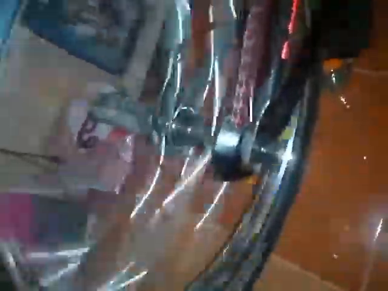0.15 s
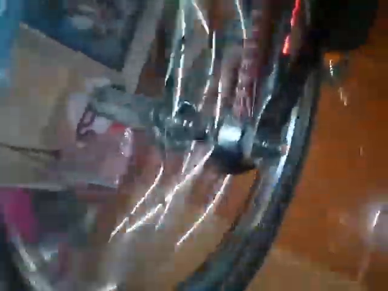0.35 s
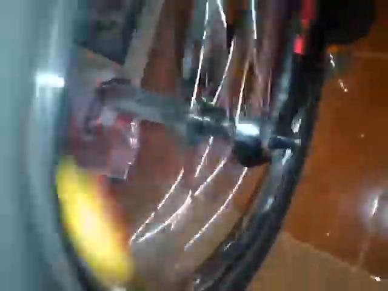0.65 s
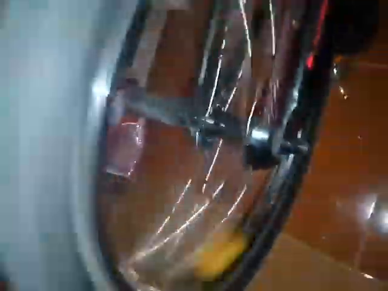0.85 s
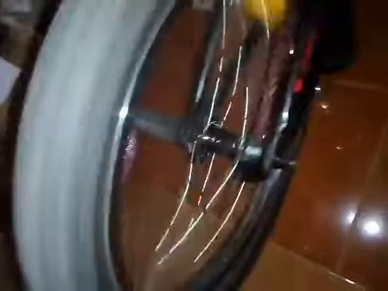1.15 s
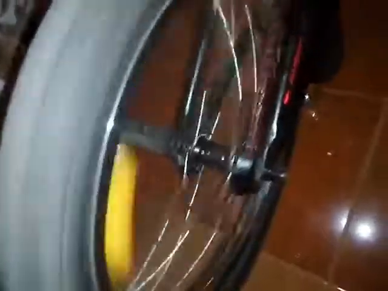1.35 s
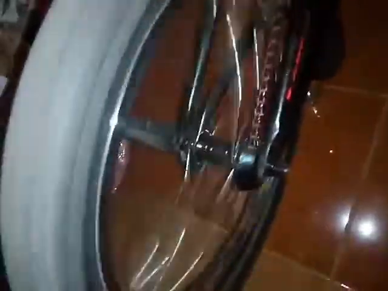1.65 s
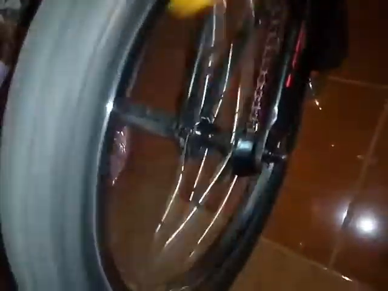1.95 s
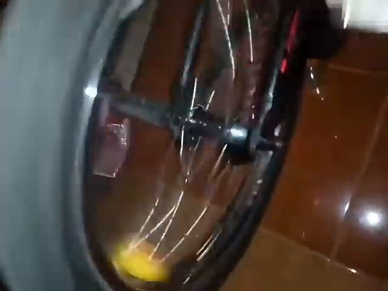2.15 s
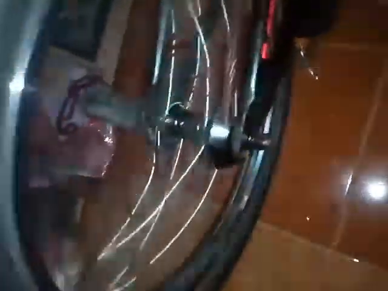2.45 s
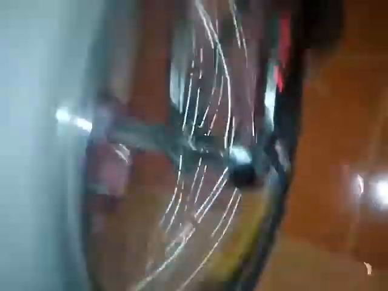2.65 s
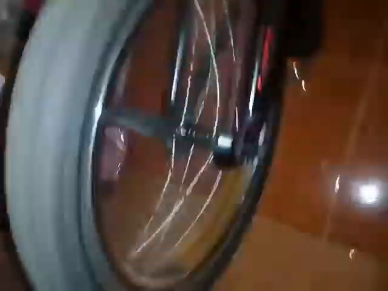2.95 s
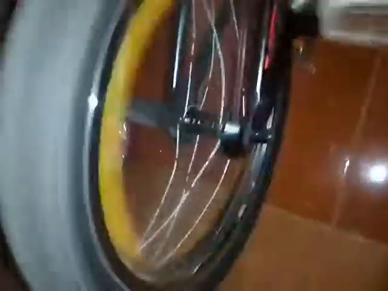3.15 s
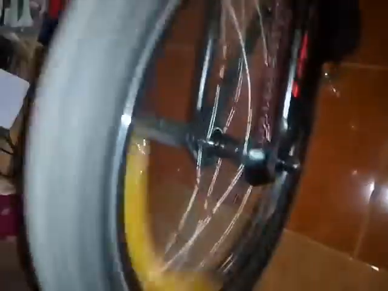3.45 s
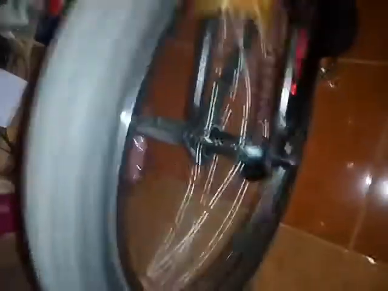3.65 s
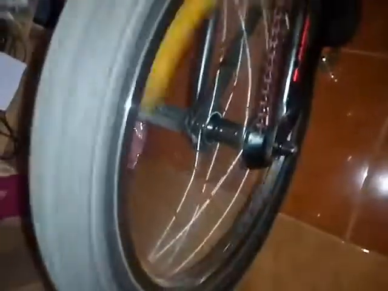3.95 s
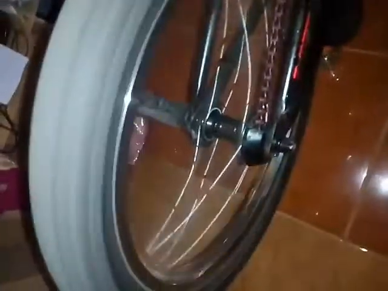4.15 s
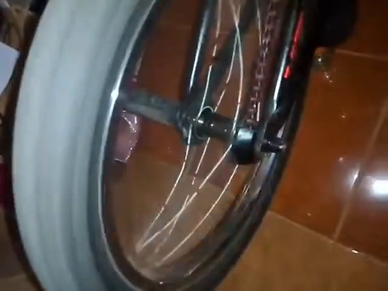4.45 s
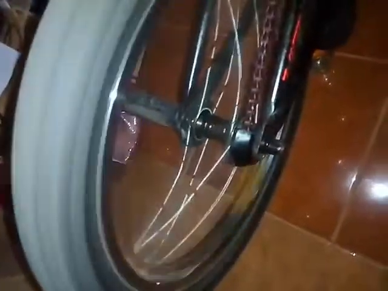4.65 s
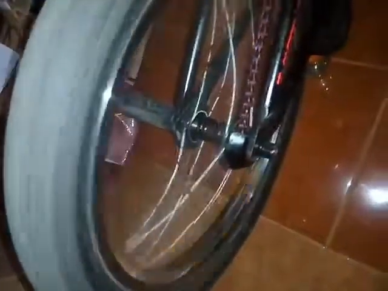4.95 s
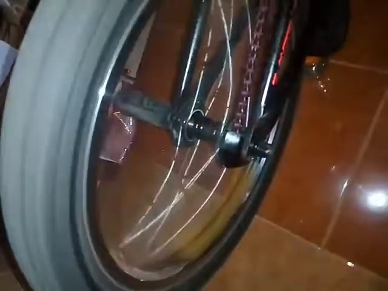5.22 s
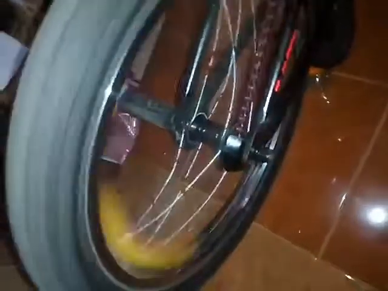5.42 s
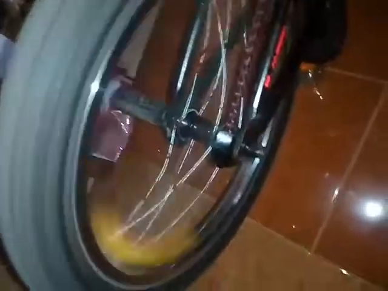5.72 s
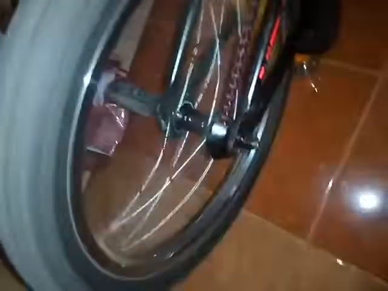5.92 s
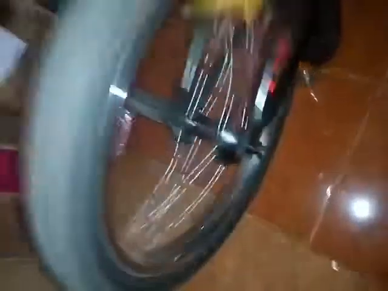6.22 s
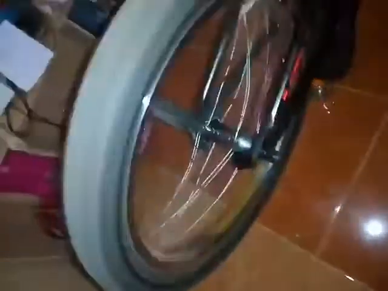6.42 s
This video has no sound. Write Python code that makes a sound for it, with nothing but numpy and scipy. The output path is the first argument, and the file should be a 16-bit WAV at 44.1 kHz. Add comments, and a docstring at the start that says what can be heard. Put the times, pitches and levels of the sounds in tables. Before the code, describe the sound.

Very close to a bicycle's rear hub in a small tiled room. A short run of fast ratchet clicks slows and stops, light chain ticks follow, then a second short burst. Chain rustle and hard metallic clacks come next, then a long, bright, cricket-like buzz that gradually sinks, with a few soft tyre brushes, slowing abruptly into single clicks and a final chain rustle.

```python
"""Rear wheel cranked by hand

A bicycle stands on the tiles of a small room, a phone's microphone close by, and its rear wheel is cranked by hand.
When the cranks rest, two freehub pawls drop over the ratchet teeth as filtered impacts: two short bursts, then a
long buzz that sinks as the wheel coasts. Pushes bring a rustle of tiny chain clicks, with ticks link by link, a
stronger drone of filtered noise from the frame, and knocks; twice the drive catches with a hard clack."""
import sys
import numpy as np
from scipy import signal
from scipy.fft import rfft, irfft, next_fast_len
from scipy.io import wavfile
from scipy.ndimage import uniform_filter1d, map_coordinates

SR = 44100
rng = np.random.default_rng(int(sys.argv[2]) if len(sys.argv) > 2 else 0)


def int16_out(signal):
    """Quantize to a 16-bit WAV file."""
    q = np.round(np.clip(np.atleast_2d(signal).T, -1, 1) * 32767)
    wavfile.write(sys.argv[1], SR, q.astype(np.int16))


N = 290178
RING_SIZE = 16384  # samples in one contact or one filter response

# In every colour, mode and shade table the levels are relative: each filter is scaled to unit energy.

# The two short spins, hub close to the microphone: [t/s, rate/(pawl drops per s)]
FIRST_SPIN = [(0.002, 55.8), (0.15, 54.7), (0.28, 50.8), (0.36, 44.6), (0.42, 35.2)]
SECOND_SPIN = [(1.523, 40.7), (1.58, 46.5), (1.64, 62.5), (1.73, 70.4), (1.96, 62.4), (2.02, 43.5),
               (2.07, 34.2)]
# Single full drops of a pawl while the hub turns slowly: [t/s, approximate peak level/dB]
PAWL_DROPS = [(0.4429, -12.5), (0.4761, -12.5), (0.5192, -13.5), (0.5706, -14), (1.4572, -15),
              (1.4982, -14.5), (2.1231, -16), (3.2957, -17.5), (3.3206, -15.5), (3.3414, -17.5),
              (3.3807, -17.5), (3.399, -13), (3.4221, -15), (6.4367, -21), (6.4582, -20), (6.4838, -17.5)]
# Broad colour of the hub shell: [f/Hz, level/dB]
HUB_COLOUR = [(100, -51), (290, -42.5), (530, -42), (690, -25), (1250, -25), (1600, -15.5), (3000, -9),
              (5000, -14), (5700, -6), (7300, -10.5), (9000, -23.5), (10200, -16.5), (12000, -18),
              (13600, -21.5), (15500, -22.5)]
# Resonances of the hub shell above that colour: [f/Hz, width/Hz, level/dB]
HUB_MODES = [(669, 80, 5.5), (1507, 46, 6), (1956, 204, 5.5), (2248, 215, 10), (2382, 166, 8),
             (3850, 87, 4), (4220, 65, 1.5), (4150, 410, 4.5), (4338, 238, 11), (5960, 110, 2),
             (7070, 87, 7), (11470, 180, 6.5), (12500, 380, 11.5), (12846, 336, 11.5)]
# Change of the hub's colour at low speed: [f/Hz, width/Hz, level/dB]
SLOW_SHADE = [(730, 130, 5), (1580, 260, -2.5), (2870, 110, 1), (4360, 370, -0.5)]


def freehub():
    """Spins and single drops ring one hub shell; the long buzz goes without the low-speed shade."""
    slow = spin(FIRST_SPIN, jitter_s=0.0003, scatter_db=1.5, hold_s=0.0643, room_db=0.1, ease_db=-0.5)
    slow += spin(SECOND_SPIN, jitter_s=0.0003, scatter_db=0.5, hold_s=0.0728, room_db=0.0, ease_db=2)
    slow += hits(PAWL_DROPS, lambda: pawl_drop(room_db=-0.2), crest_db=18.0)
    fast = spin(long_spin(), jitter_s=0.00015, scatter_db=1.69, hold_s=0.2014, room_db=0.1, ease_db=9.5,
                waver=0.003)
    return body(slow, HUB_COLOUR, HUB_MODES + SLOW_SHADE) + body(fast, HUB_COLOUR, HUB_MODES)


COAST_START_S, CRANK_AGAIN_S, COAST_END_S = 3.441, 6.21, 6.42
WHEEL_RATE, FRICTION_PER_S = 181, 8  # wheel's speed at the start (teeth/s) and its loss (teeth/s per s)
CRANK_RATE, CRANK_STOP_S, CRANK_GAIN_PER_S = 115, 0.1, 510  # teeth/s, decay time s, teeth/s per s


def long_spin():
    """(s, pawl drops per s) rows, wheel less cranks: cranks stop, friction slows the wheel, cranks catch up."""
    s = np.linspace(COAST_START_S, COAST_END_S, 300)
    wheel = WHEEL_RATE - FRICTION_PER_S * (s - COAST_START_S)
    stopping = CRANK_RATE * np.exp((COAST_START_S - s) / CRANK_STOP_S)
    cranking_again = CRANK_GAIN_PER_S * np.maximum(s - CRANK_AGAIN_S, 0)
    return np.column_stack([s, wheel - (stopping + cranking_again)])


BUZZ_DB, BUZZ_DB_PER_DOUBLING = -20, 2.5  # level going into the hub at WHEEL_RATE, and its growth with speed
EASE_S = 0.089  # time constant of the change in level toward the end of a spin


def spin(rows, jitter_s, scatter_db, hold_s, room_db, ease_db, waver=0):
    """Two pawls drop in turn, one drop a tooth, louder with speed; each fades to a new ring every hold_s."""
    s, rate = np.transpose(rows)
    t = np.arange(s[0], s[-1] + 0.01, 1 / SR)
    speed = np.interp(t, s, rate) * (1 + waver * wobble(6)[:len(t)])
    teeth = np.cumsum(speed) / SR
    times = np.interp(np.arange(int(teeth[-1]) + 1), teeth, t)
    rates = np.interp(times, s, rate)
    db = BUZZ_DB + BUZZ_DB_PER_DOUBLING * np.log2(rates / WHEEL_RATE)
    db -= ease_db * np.exp((times - s[-1]) / EASE_S)
    sizes = amp(db) * np.sqrt(SR / rates)  # unit-energy drops at this rate then have rms amp(db)
    chance = rng.standard_normal((len(times), 2))
    turn = (times - s[0]) / hold_s
    rings = [(pawl_drop(room_db), pawl_drop(room_db)) for _ in range(int(turn[-1]) + 2)]
    track = np.zeros(N)
    for k, (late, strong) in enumerate(chance):
        old, pawl = int(turn[k]), k % 2
        blend = turn[k] % 1 * np.pi / 2
        ring = np.cos(blend) * rings[old][pawl] + np.sin(blend) * rings[old + 1][pawl]
        add(track, times[k] + jitter_s * late, sizes[k] * amp(scatter_db * strong) * ring)
    return track


def pawl_drop(room_db, bounce_s=0.0016, loss_db=1.35, count=5):
    """A pawl snaps into the next tooth and chatters there for a few milliseconds."""
    gaps = bounce_s * rng.uniform(0.5, 1.5, count - 1)
    delays = np.r_[0, np.cumsum(gaps)]
    levels = -loss_db * np.arange(count) + rng.normal(0, 1.0, count)
    bounces = list(zip(delays, levels))
    return impact(crack_t60=0.0088, rattle_t60=0.027, rattle_db=-7, room_db=room_db, bounces=bounces)


# Low ring of the frame, read at each partial: [f/Hz, relative level/dB]
THROB_COLOUR = [(560, -28), (690, 4), (760, 0), (900, -3.5), (1050, 1), (1300, -8)]
THROB_DB = -55  # rms over the whole scene
THROB_SWELL_DB, THROB_JITTER_S = 5.5, 0.00022  # random spread of each partial's level and of the beat's timing


def throb():
    """At speed one pawl also knocks the frame, every second tooth: wavering partials follow the hub's rate."""
    rate = curve(long_spin())
    beat = rate / 2
    turns = np.cumsum(beat) / SR + THROB_JITTER_S * beat * wobble(31)

    def partial(k):
        level = amp(along(THROB_COLOUR, k * beat) + THROB_SWELL_DB * wobble(9))
        return level * np.sin(2 * np.pi * k * turns)

    partials = sum(partial(k) for k in range(7, 14))
    return amp(THROB_DB) * unit((rate / WHEEL_RATE) ** 2 * partials)


# The drive catches and the chain knocks, close by: [t/s, approximate peak level of the knock/dB]
CLACKS = [(2.256, -34), (2.371, -14), (2.3753, -12), (2.515, -27.5), (2.851, -28), (2.914, -24),
          (3.232, -10), (3.267, -18.5), (6.507, -25.5)]
# Broad colour of the knocked frame: [f/Hz, level/dB]
CLACK_COLOUR = [(100, -49), (260, -10.5), (420, -12), (700, -9.5), (1050, -5.5), (1550, -11), (2000, -4.5),
                (2700, -4.5), (3400, -18), (4500, -12.5), (6400, -17), (7500, -33), (9000, -48),
                (15000, -32)]
# Resonances of the knocked frame: [f/Hz, width/Hz, level/dB]
CLACK_MODES = [(990, 110, 4.8), (1990, 230, 10.9), (2240, 170, 5.7), (2406, 78, 8.2), (2760, 380, 3.4)]
# Partials of the steel sprocket ring: [f/Hz, relative level/dB, t60/s]
STEEL = [(10150, -1, 0.14), (10130, -1, 0.19), (10650, -12, .1), (11170, 3, .18), (11400, -1, .14),
         (11600, 0, .1), (12270, 1, .09)]


def clacks(waver=1.5):
    """The chain snaps taut: the frame knocks, and hard blows also ring the sprocket high above it."""
    knock = lambda: impact(crack_t60=0.0077, rattle_t60=0.082, rattle_db=2, room_db=0.0)
    knocks = hits(CLACKS, knock, crest_db=19.5)
    steel = np.zeros(N)
    t = np.arange(RING_SIZE) / SR
    # random phase drift, waver in radians
    blur = lambda: waver * map_coordinates(rng.standard_normal(80), [t * 160], mode="mirror")
    for s, db in CLACKS:
        ring = np.zeros(RING_SIZE)
        for hz, level, t60 in STEEL:
            decay = amp(level + rng.normal(0, 1.4) - 60 * t / t60)
            ring += decay * np.sin(2 * np.pi * hz * t + blur())
        add(steel, s, amp(2 * db - 16.5) * ring)  # the ring grows with the square of the blow
    return body(knocks, CLACK_COLOUR, CLACK_MODES) + steel


# Pushes on the cranks: [start t/s, length/s, chain rustle level/dB, frame drone level/dB]
PUSHES = [(0.507, 0.85, -55, -71.5), (2.057, 0.21, -47.5, -64), (2.413, 0.079, -42, -67),
          (2.602, 0.55, -42.5, -54), (3.268, 0.31, -43, -57), (6.32, 0.29, -38.5, -53)]
PUSH_ATTACK_S, PUSH_RELEASE_S = 0.015, 0.1
# Broad colour of the chain: [f/Hz, level/dB]
CHAIN_COLOUR = [(200, -32.5), (380, -34), (550, -7.5), (1000, -6), (1450, -1), (2050, 6.5), (3300, -7.5),
                (4250, -1.5), (4900, -7.5), (6200, -1.5), (7700, -13.5), (9300, -24), (12800, -13.5),
                (14000, -44)]


def chain(links_per_s=200, spread_db=3):
    """During each push the rollers seat on the teeth in a rustle of tiny clicks."""
    seats = (rng.random(N) < links_per_s / SR) * amp(spread_db * rng.standard_normal(N))
    click = impact(crack_t60=0.023, rattle_t60=0.03, rattle_db=4.5, room_db=10.0)
    rustle = signal.fftconvolve(seats, click)[:N]
    level = sum(amp(db) * swell(s, length, PUSH_ATTACK_S, PUSH_RELEASE_S) for s, length, db, _ in PUSHES)
    return level * unit(body(rustle, CHAIN_COLOUR))


# Stray light ticks of the drive: [t/s, approximate peak level/dB]
TICKS = [(0.716, -28.5), (0.7731, -31.5), (0.8028, -28.5), (2.9911, -25), (3.0087, -19.5), (3.0784, -21),
         (3.2051, -18.5), (3.2592, -17.5), (6.5525, -22)]
# Links ticking evenly onto the sprocket: [first t/s, last t/s, links, first level/dB, last level/dB]
# (peak levels before the mid-push swell)
TICK_RUNS = [(0.9707, 1.4005, 7, -32, -35), (2.5345, 2.7625, 7, -30, -22.5), (2.5990, 2.7155, 4, -21, -38)]
# Broad colour of a tick: [f/Hz, level/dB]
TICK_COLOUR = [(200, -13), (1000, -17), (2000, 2), (3400, -2), (4300, 5), (6400, 3), (7800, -5),
               (8200, -14.5), (11500, -16.5), (13000, -9.5), (13700, -30), (15500, -28)]
# Resonances of a tick: [f/Hz, width/Hz, level/dB]
TICK_MODES = [(2160, 520, 5.1), (7640, 87, 4), (8700, 160, 13), (13000, 500, 3.5)]


def ticks():
    """Light contacts of the drive, stray or link by link, ring with a colour of their own."""
    tick = lambda: impact(crack_t60=0.039, rattle_t60=0.081, rattle_db=-6, room_db=-1.5)
    rows = TICKS + link_by_link(TICK_RUNS, swell_db=4)
    return body(hits(rows, tick, crest_db=16.5), TICK_COLOUR, TICK_MODES)


# Links knocking evenly onto the chainring: [first t/s, last t/s, links, first level/dB, last level/dB]
# (peak levels before the mid-push swell)
CHAINRING_RUNS = [(0.9335, 1.1615, 4, -35.5, -38)]
# One link is too light to shake the frame: [f/Hz, width/Hz, level/dB]
LINK_SHADE = [(600, 940, -16)]


def chainring():
    """Single links knock onto the chainring, like small, thin clacks."""
    knock = lambda: impact(crack_t60=0.034, rattle_t60=0.07, rattle_db=-4, room_db=-4.5)
    knocks = hits(link_by_link(CHAINRING_RUNS, swell_db=0.8), knock, crest_db=20.5)
    return body(knocks, CLACK_COLOUR, CLACK_MODES + LINK_SHADE)


def link_by_link(runs, swell_db):
    """One (s, peak dB) row for each evenly spaced link, with a swell that peaks in mid-push."""
    rows = []
    for first, last, links, first_db, last_db in runs:
        for u in np.linspace(0, 1, round(links)):
            db = first_db + u * (last_db - first_db) + swell_db * np.sin(np.pi * u)
            rows.append((first + u * (last - first), db))
    return rows


# Dull bumps of the frame: [t/s, approximate peak level/dB]
BUMPS = [(2.604, -24.5), (2.965, -31), (3.072, -33)]
# Broad colour of the bumped frame: [f/Hz, level/dB]
BUMP_COLOUR = [(80, -32), (190, -14.5), (290, 0), (450, 0.5), (780, 4.5), (1000, -5.5), (2500, -10),
               (6000, -56)]


def bumps():
    """Soft blows on the frame, with little treble."""
    bump = lambda: impact(crack_t60=0.056, rattle_t60=0.09, rattle_db=-9.0, room_db=-4.5)
    return body(hits(BUMPS, bump, crest_db=22.0), BUMP_COLOUR)


# The wheel brushes against something: [start t/s, length/s, level/dB]
BRUSHES = [(0.835, 0.021, -48.5), (1.695, 0.59, -51), (2.93, 0.084, -43), (5.18, 0.12, -43),
           (5.509, 0.12, -32.5), (5.852, 0.084, -41.5)]
BRUSH_RELEASE_S = 0.065
# Broad colour of the brushing tyre: [f/Hz, level/dB]
TYRE_COLOUR = [(300, -35.5), (580, -15.5), (750, -6.5), (1100, -0.5), (1550, -3), (2500, -6.5), (6000, -85)]


def tyre(attack_share=0.25):
    """Each brush of the wheel is coloured noise that swells and dies away."""
    level = sum(amp(db) * swell(s, length, attack_share * length, BRUSH_RELEASE_S) for s, length, db in BRUSHES)
    return level * rush(TYRE_COLOUR)


# Brief swells of the frame's drone: [start t/s, length/s, level before the waver/dB]
HUMS = [(0.844, 0.033, -56.5), (1.384, 0.092, -60)]
# Broad colour of the droning frame: [f/Hz, level/dB]
FRAME_COLOUR = [(100, -39), (200, -12.5), (290, 5), (340, -5), (390, -4.5), (480, -15), (800, -6),
                (2000, -37.5)]
DRONE_DB = -62  # level at WHEEL_RATE, before the waver


def drone(waver_db=1.0):
    """The frame drones unevenly, in step with the hub's speed and more strongly under each push."""
    speed = (curve(FIRST_SPIN) + curve(SECOND_SPIN) + curve(long_spin())) / WHEEL_RATE
    pushed = sum(amp(db) * swell(s, length, PUSH_ATTACK_S, PUSH_RELEASE_S) for s, length, _, db in PUSHES)
    hums = sum(amp(db) * swell(s, length, attack_s=0.03, release_s=0.024) for s, length, db in HUMS)
    level = amp(DRONE_DB) * speed + pushed + hums
    return level * amp(waver_db * wobble(12)) * rush(FRAME_COLOUR)


# Broad colour of the low rumble: [f/Hz, level/dB]
RUMBLE_COLOUR = [(20, -18), (38, -4), (52, 8.5), (65, -8), (80, -1.5), (105, -4), (140, -8.5), (400, -15),
                 (3000, -37)]
RUMBLE_DB, RUMBLE_GROWS = -70, 0.48  # rms level; dB of rumble per dB of the bicycle's noise


def rumble(bicycle, smooth_s=0.13):
    """A faint low rumble rises and falls with the bicycle's noise."""
    power = uniform_filter1d(bicycle ** 2, int(smooth_s * SR))
    loudness = np.sqrt(np.abs(power))
    return amp(RUMBLE_DB) * unit(loudness ** RUMBLE_GROWS * rush(RUMBLE_COLOUR))


# Reverberation of the small tiled room: [f/Hz, t60/s]
ROOM = [(200, 0.31), (2000, 0.26), (6000, 0.29), (13000, 0.19)]


def impact(crack_t60, rattle_t60, rattle_db, room_db, bounces=((0, 0),)):
    """A unit-energy contact: a crack per (delay s, dB) bounce, a rattle through the frame, the room's answer."""
    t = np.arange(RING_SIZE) / SR
    burst = lambda envelope: unit(rng.standard_normal(RING_SIZE) * envelope)
    cracks = sum((t >= delay) * amp(db - 60 * np.abs(t - delay) / crack_t60) for delay, db in bounces)
    rattle = burst(amp(-60 * t / rattle_t60))
    # the room: noise that decays at its own pace in each band
    hz, when, bands = signal.stft(rng.standard_normal(RING_SIZE), SR, nperseg=256)
    bands = bands * amp(-60 * when / along(ROOM, hz)[:, None])
    tail = signal.istft(bands, SR, nperseg=256)[1][:RING_SIZE]
    tail = unit(tail * (1 - np.exp(-t / 0.0064)))
    sound = burst(cracks) + amp(rattle_db) * rattle + amp(room_db) * tail
    return sound / np.linalg.norm(sound)


def hits(rows, contact, crest_db):
    """A fresh contact for each (s, peak dB) row; crest_db is a contact's energy over its peak."""
    track = np.zeros(N)
    for s, db in rows:
        add(track, s, amp(db + crest_db) * contact())
    return track


def body(x, colour, modes=()):
    """Pass x through a causal filter of unit energy: a broad colour with resonances on it."""
    hz = np.fft.rfftfreq(RING_SIZE, 1 / SR)
    db = along(colour, hz)
    for centre, width, rise in modes:
        db = db + rise / (1 + (2 * (hz - centre) / width) ** 2)
    # folding the cepstrum gives minimum phase
    cepstrum = irfft(np.log(amp(db)))
    cepstrum[1:RING_SIZE // 2] *= 2
    cepstrum[RING_SIZE // 2 + 1:] = 0
    response = irfft(np.exp(rfft(cepstrum)))
    return signal.fftconvolve(x, response / np.linalg.norm(response))[:N]


def rush(colour):
    """Coloured noise of rms 1."""
    return unit(body(rng.standard_normal(N), colour))


def wobble(rate):
    """A smooth random curve with rate knots a second."""
    s = np.linspace(0, N / SR, 4000)
    knots = rng.standard_normal(200)
    return np.interp(np.arange(N) / SR, s, map_coordinates(knots, [s * rate], mode="mirror"))


def swell(start, length, attack_s, release_s):
    """An envelope that rises, holds until start + length and dies away."""
    t = np.arange(N) / SR - start
    return np.clip(t / attack_s, 0, 1) * np.exp(-np.maximum(t - length, 0) / release_s)


def curve(rows):
    """One value per sample from (s, value) rows, zero outside them."""
    return np.interp(np.arange(N) / SR, *np.transpose(rows), left=0, right=0)


def along(points, hz):
    """(Hz, value) points read on a log axis."""
    f, v = np.transpose(points)
    return np.interp(np.log(hz + 1), np.log(f + 1), v)


def amp(db):
    """Decibels to gain."""
    return 10 ** (np.asarray(db) / 20)


def unit(x):
    """Scale to rms 1."""
    return x / np.sqrt(np.mean(x ** 2) + 1e-20)


def add(track, s, sound):
    """Mix a sound into the track at time s."""
    start = int(np.clip(round(s * SR), 0, N - 1))
    track[start:start + len(sound)] += sound[:N - start]


def scene():
    """Hub, chain, frame and brushing wheel over a low rumble."""
    bicycle = freehub() + throb() + clacks() + chain() + ticks() + chainring() + bumps() + tyre() + drone()
    return (bicycle + rumble(bicycle))[None]


TOP_HZ = 15650  # the phone's band limit


def record(dry):
    """The phone's microphone, close to the hub, keeps nothing above its band limit."""
    size = next_fast_len(N + SR // 2)
    kept = np.fft.rfftfreq(size, 1 / SR) < TOP_HZ
    return irfft(rfft(dry, size) * kept, size)[..., :N]


dry = scene()
out = record(dry)
int16_out(out)
```